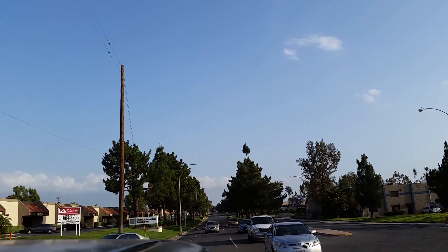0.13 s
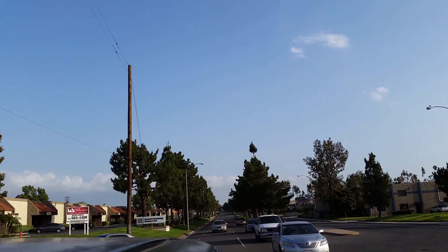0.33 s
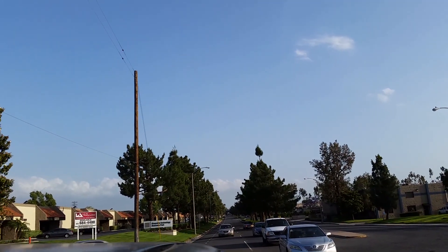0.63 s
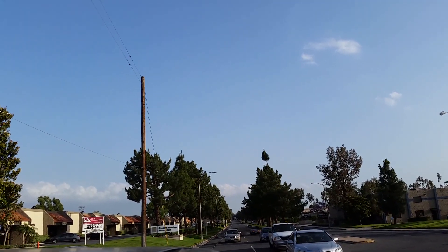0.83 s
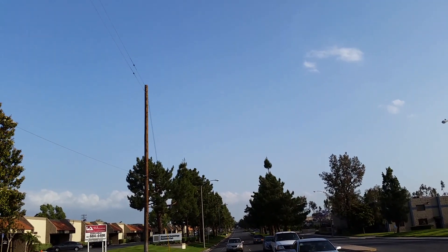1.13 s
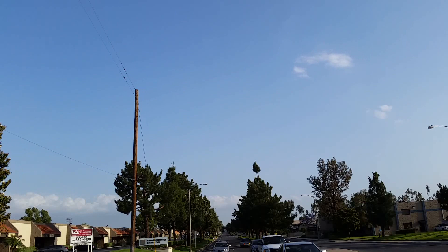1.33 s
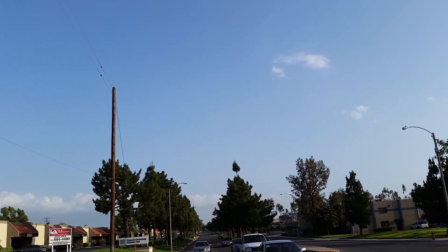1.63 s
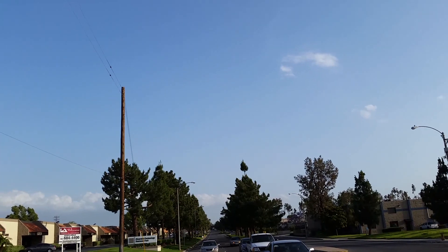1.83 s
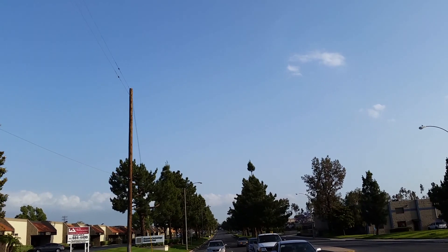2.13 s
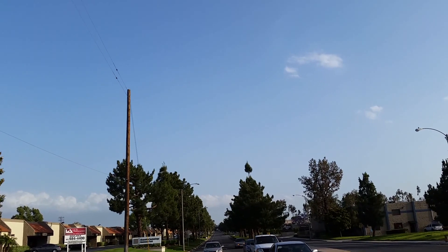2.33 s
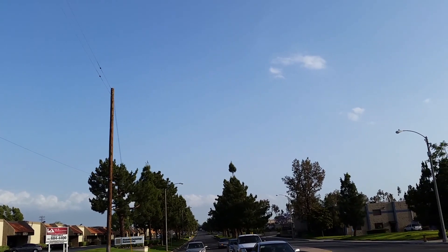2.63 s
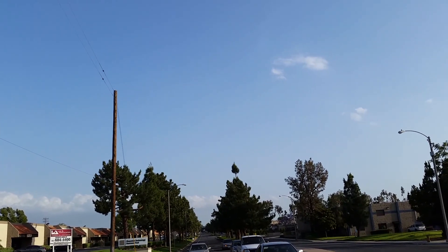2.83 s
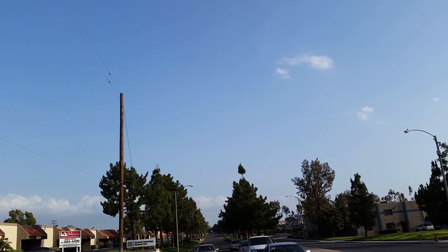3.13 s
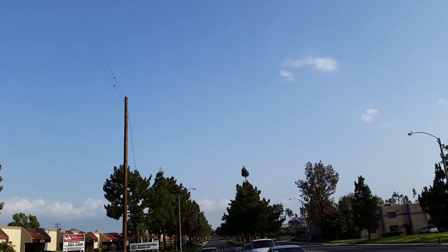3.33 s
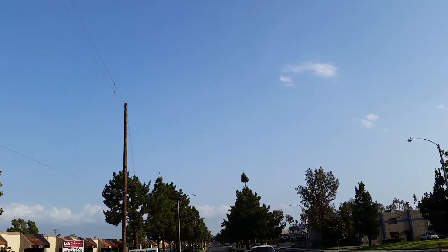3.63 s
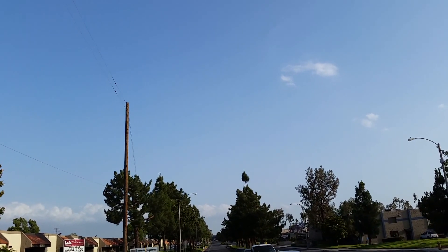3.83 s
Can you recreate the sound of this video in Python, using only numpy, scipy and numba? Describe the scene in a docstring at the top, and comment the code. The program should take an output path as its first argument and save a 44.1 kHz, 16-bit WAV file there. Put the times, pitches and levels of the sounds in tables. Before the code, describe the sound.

A very loud five-note air horn blares close by and holds to the end, overloading the microphone; before it, wind buffets and thumps the microphone over fading road roar beside a suburban street.

```python
"""A five-chime locomotive air horn blasts close by, over wind that buffets the microphone and distant traffic.
Each bell is a stack of harmonics that starts sharp and settles, with a pulsing rasp of air around it;
the top bell beats ever more slowly against the octave of the lowest.
Wind, road and a small knock are shaped noise; single eddies are short pressure bumps.
The blast pulls the recorder's gain down and overloads it."""
import sys
import numpy as np
from scipy.fft import rfft, irfft, next_fast_len
from scipy.io import wavfile
from scipy.ndimage import map_coordinates
from numba import njit

SR = 44100
rng = np.random.default_rng(int(sys.argv[2]) if len(sys.argv) > 2 else 0)


def unload_audio(sound):
    """Save the sound as a 16-bit wav file, at the path given as the first command line argument."""
    columns = np.transpose(np.atleast_2d(sound))
    # keep every value between -1 and 1, then stretch to whole-number steps
    steps = np.round(np.clip(columns, -1, 1) * 32767)
    wavfile.write(sys.argv[1], SR, steps.astype(np.int16))


N = 176400  # samples: 4 s

HORN_START_S = 2.28  # the valve opens


def horn():
    """Air pressure swells as the valve opens and sounds the bells together with their rasp."""
    attack_s, gain_db = 0.093, 14
    t = np.maximum(np.arange(N) / SR - HORN_START_S, 0)
    tone = chord()
    pressure = np.minimum(t / attack_s, 1) ** 1.2
    return amp(gain_db) * pressure * (tone + rasp(tone, t))


def chord(count=20):
    """Five bells, each a stack of harmonics that brightens with the pressure and flutters in the moving air."""
    # the bells, low to high: pitch f/Hz, sharpness at the start [share of the pitch], drift [Hz per s]
    bells = [(315, .031, -.72), (367, .056, 0), (422.8, .035, .5), (488.8, .06, 0), (621.8, .013, .62)]
    # extra level of each bell at the start, gone once it settles: level/dB
    speak_boosts = [1.5, 10.5, -2.5, 0.5, 6.5]
    # one row per bell at each port, before the horn gain: level/dB of harmonics 1-6
    left_harmonics = [(-17.5, -8.5, -19.5, -26.5, -29.5, -29), (-19, -12.5, -26, -20, -39, -37),
                      (-12, -18.5, -20, -34, -35.5, -42), (-39, -34, -31.5, -25, -48, -30.5),
                      (-11.5, -19.5, -19, -23, -50, -34)]
    right_harmonics = [(-15, -5, -20, -31.5, -43, -32.5), (-20.5, -14.5, -26, -18, -23, -22.5),
                       (-25, -11.5, -19.5, -20, -52, -49), (-16.5, -24, -17, -39, -31, -38.5),
                       (-12.5, -16.5, -25, -34.5, -34.5, -38.5)]
    # harmonics above those, all bells, before the horn gain: f/Hz, level/dB
    upper_harmonics = [(2000, -29), (2500, -33), (3000, -37), (3700, -44), (4400, -42), (5200, -50),
                       (7000, -48), (14000, -76)]
    settle_s, pitch_jitter = 0.085, 0.00088  # time constant; share of the pitch
    dull_db_per_octave, open_s, dull_corner_hz = 24, 0.041, 722  # treble missing at the start
    flutter_db_per_khz, smear_rad_per_khz = 1.52, 0.25
    right_lead_s = 0.0002  # the right port hears the horn first

    start = round(HORN_START_S * SR)
    t = np.arange(N - start) / SR
    out = np.zeros((2, N))
    dull_db = dull_db_per_octave * np.exp(-t / open_s)
    settling = np.exp(-t / settle_s)
    unsteady = pitch_jitter * wobble(60.6, len(t))  # the bells share one air line
    for (hz, sharp, drift), speak_db, left, right in zip(bells, speak_boosts, left_harmonics, right_harmonics):
        pitch = hz * (1 + sharp * settling + unsteady) + drift * t
        turn = 2 * np.pi * np.cumsum(pitch) / SR
        for k in range(1, count + 1):
            partial_hz = k * hz
            khz = partial_hz / 1000
            octaves_above_corner = max(0, np.log2(partial_hz / dull_corner_hz))
            # the lowest two harmonics start in step, the others anywhere
            offset = rng.uniform(0, 2 * np.pi) * (k > 2)
            for port, levels in enumerate((left, right)):
                db = levels[k - 1] if k <= len(levels) else along(upper_harmonics, partial_hz)
                db = db + speak_db * settling - dull_db * octaves_above_corner
                # level flutter stops growing above 2 kHz
                db = db + flutter_db_per_khz * min(khz, 2) * wobble(9.025, len(t))
                lead = 2 * np.pi * hz * right_lead_s * port
                smear = smear_rad_per_khz * khz * wobble(14, len(t))
                phase = k * (turn + lead) + offset + smear
                out[port, start:] += np.sqrt(2) * amp(db) * np.sin(phase)
    return out


def rasp(tone, t):
    """Turbulent air rushing through the bells, pulsing with the size of their tone and slowly fading."""
    # colour at each port: f/Hz, relative level/dB
    left_colour = [(30, -34), (100, -7), (220, -6.5), (500, 1.5), (1000, 3.5), (2000, -10.5), (3200, -12),
                   (4800, -18), (7000, -14), (8600, -25.5), (12000, -22.5), (14500, -36.5)]
    right_colour = [(30, -28), (100, -8), (220, -2), (500, -20), (1000, -10), (2000, -2), (3200, -10),
                    (4800, -15.5), (7800, -17.5), (10000, -16), (12000, -19.5), (14500, -25.5)]
    port_db = [[-11], [-12]]  # left, right, before the horn gain
    rise_s, fade_db_per_s, pulse_share = 0.092, 3, 0.26
    pulsing = 1 - pulse_share + pulse_share * np.abs(tone) / tone[:, t > 0].std()
    air = np.array([noise(left_colour), noise(right_colour)]) * amp(port_db)
    envelope = (1 - np.exp(-t / rise_s)) ** 2 * amp(-fade_db_per_s * t)
    return air * pulsing * envelope


def wind():
    """Each port is buffeted on its own; stronger gusts add a brighter flapping in quick bursts."""
    # gust strength over both ports: t/s, level/dB, left minus right/dB
    gusts = [(0.0, -21, 41), (0.02, -26.5, -1.0), (0.2, -28, -4.5), (0.21, -22, -11.5), (0.27, -23.5, 1.0),
             (0.32, -19, -8), (0.34, -35, 5), (0.36, -18.5, -2), (0.42, -16.5, -23), (0.46, -24, -7.5),
             (0.51, -16, -16), (0.55, -21.5, -2), (0.62, -13.5, -4.5), (0.75, -19, -22.5),
             (0.81, -30.5, -1), (0.93, -21, -16.5), (1.02, -20, -18), (1.08, -28, -7.5), (1.15, -21.5, -16),
             (1.59, -16.5, -19.5), (1.64, -24.5, 2), (1.65, -28.5, -7.5), (1.73, -16.5, -16),
             (1.85, -20, -20), (1.87, -29, -21.5), (1.89, -26, -6), (1.96, -18, -26), (2.01, -10, -11.5),
             (2.06, -21.5, -18), (2.19, -24, -5), (2.25, -16.5, -17), (2.28, -21.5, -22)]
    # colour of the low rumble: f/Hz, relative level/dB
    rumble_colour = [(15, -8), (40, -11), (90, 0.5), (135, -3.5), (200, -8.5), (300, -15), (500, -38),
                     (1000, -86.5)]
    # colour of the flapping: f/Hz, relative level/dB
    flap_colour = [(60, -11), (200, -2), (300, -3), (500, -8.5), (700, -20), (1200, -36.5), (3000, -70),
                   (8000, -88)]
    eddies_per_s, rumble_swing_db, flap_swing_db = 110, 3, 5
    flap_base_db, flap_growth = -10, 1.64  # flapping at the top gust level; dB per dB of gust
    lull_db_per_s = 2.5  # the wind eases during the blast

    level_db, pan_db = curves(gusts)
    top_db = level_db.max()
    share = np.array([amp(pan_db), np.ones(N)])
    share = share / np.linalg.norm(share, axis=0)
    ports = []
    for port_db in level_db + 20 * np.log10(2 * share):
        gust_db = port_db - top_db
        eddies = wobble(eddies_per_s, N)
        flap_db = flap_base_db + flap_growth * np.minimum(gust_db, 6) + flap_swing_db * eddies
        rumble = amp(gust_db + rumble_swing_db * eddies) * noise(rumble_colour)
        flapping = amp(flap_db) * noise(flap_colour)
        ports.append(rumble + flapping)
    lull_db = lull_db_per_s * np.maximum(np.arange(N) / SR - HORN_START_S, 0)
    return amp(top_db - lull_db) * np.array(ports)


def slaps():
    """Single eddies strike the right port as short pressure bumps of either sign, faint at the left."""
    # the strikes: onset t/s, peak level/dB before the gain
    strikes = [(0.675, -14.5), (0.739, -12.5), (0.946, -23), (1.172, -19), (1.212, -16.5), (1.258, -35),
               (1.334, -22.5), (1.357, -17), (1.371, -13.5), (1.476, -17), (1.527, -16), (1.559, -17),
               (1.632, -20), (1.761, -23), (1.782, -12.5), (1.971, -13), (2.035, -30), (2.057, -11.5),
               (2.242, -18)]
    gain_db, width_s, left_db = 13, 0.00058, -23
    t = np.arange(N) / SR
    bumps = np.zeros(N)
    for onset_s, db in strikes:
        # the bump peaks two widths after its onset
        shape = np.exp(-((t - onset_s) / width_s - 2) ** 2)
        bumps += amp(db + gain_db) * rng.choice([-1, 1]) * shape
    return np.array([amp(left_db) * bumps, bumps])


def knock():
    """One small knock on the camera: a dry tick of decaying noise, stronger at the left port."""
    # colour of the knock: f/Hz, relative level/dB
    knock_colour = [(300, -5), (1500, 23.5), (3000, -5.5), (5000, -23), (6700, -16), (8500, -31),
                    (12000, -31), (15000, -39)]
    start_s, level_db, right_db, t60_s = 1.5845, -23, -10, 0.0073
    t = np.arange(N) / SR - start_s
    envelope = amp(level_db - 60 * np.abs(t) / t60_s) * (t >= 0)
    return envelope * noise(knock_colour) * amp([[0], [right_db]])


def traffic():
    """Road roar, partly alike at both ports, and separate tyre hiss fade unevenly as a car moves off."""
    # the passing levels before the gains: t/s, roar level/dB, tyre hiss level/dB
    passing = [(0, -46, -63.5), (.42, -47.5, -66), (.62, -50.5, -67.5), (.75, -55, -72.5),
               (.92, -52.5, -75), (1.35, -56, -81), (1.7, -53, -74), (2.0, -56.5, -76), (2.25, -54, -77)]
    # colour of the roar: f/Hz, relative level/dB
    roar_colour = [(40, -18.5), (120, -5.5), (300, 8), (500, 1.5), (900, 2), (1500, -7.5), (2200, -14),
                   (3000, -24), (4500, -46), (6500, -55), (14000, -72)]
    # colour of the tyre hiss: f/Hz, relative level/dB
    hiss_colour = [(1000, -9.5), (3000, 4), (4500, -7), (6800, -6.5), (7800, -18.5), (10000, -14.5),
                   (14000, -9)]
    roar_gain_db, hiss_gain_db = 15, 6.5
    alike = 0.2  # share of the roar's power common to both ports
    roar_db, hiss_db = curves(passing)
    common = np.sqrt(alike) * noise(roar_colour)
    separate = np.sqrt(1 - alike) * np.array([noise(roar_colour), noise(roar_colour)])
    roar = amp(roar_db + roar_gain_db) * (common + separate) * amp([[1], [-1.2]])  # left, right dB
    hiss = amp(hiss_db + hiss_gain_db) * np.array([noise(hiss_colour), noise(hiss_colour)])
    return roar + hiss


def scene():
    """Everything that reaches the two ports."""
    return horn() + wind() + slaps() + knock() + traffic()


@njit
def follow(peak, grab, release):
    """A level detector that rises fast and falls slowly; time constants in samples."""
    out, level = np.empty_like(peak), 0.
    for i in range(len(peak)):
        level += (peak[i] - level) / (grab if peak[i] > level else release)
        out[i] = level
    return out


def record(dry):
    """Gain control led by the louder port, soft overload and a sharp band limit."""
    ceiling, grab_s, release_s = 1.432, 0.002, 0.16
    clip_top, clip_knee, top_hz = 0.93, 4, 14616
    level = follow(np.abs(dry).max(axis=0), grab_s * SR, release_s * SR)
    x = dry * ceiling / np.maximum(level, ceiling)
    x = x / (1 + np.abs(x / clip_top) ** clip_knee) ** (1 / clip_knee)
    return filtered(x, lambda hz: hz < top_hz)


def amp(db):
    """Decibels to gain."""
    return 10 ** (np.asarray(db) / 20)


def unit(x):
    """Scale to rms 1."""
    return x / np.sqrt(np.mean(x ** 2) + 1e-20)


def along(points, hz):
    """Read (Hz, value) points on a log frequency axis."""
    f, v = np.transpose(points)
    return np.interp(np.log(hz + 1), np.log(f + 1), v)


def curves(rows):
    """One value per sample for each column after the time."""
    s, *cols = np.transpose(rows)
    return [np.interp(np.arange(N) / SR, s, c) for c in cols]


def wobble(rate, size):
    """A smooth random curve, rate knots a second."""
    coarse = np.arange(0, size + 64, 64)  # the spline is read every 64 samples
    knots = rng.standard_normal(int(size * rate / SR) + 4)
    smooth = map_coordinates(knots, [coarse * rate / SR], mode="nearest")
    return np.interp(np.arange(size), coarse, smooth)


def filtered(x, response):
    """Multiply the spectrum of x by a response of frequency."""
    m = next_fast_len(N + SR // 2)  # padded so the end does not wrap onto the start
    return irfft(rfft(x, m) * response(np.fft.rfftfreq(m, 1 / SR)), m)[..., :N]


def noise(spectrum):
    """Coloured noise of rms 1."""
    return unit(filtered(rng.standard_normal(N), lambda hz: amp(along(spectrum, hz))))


dry = scene()
out = record(dry)
unload_audio(out)
```